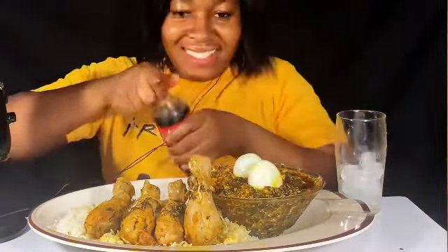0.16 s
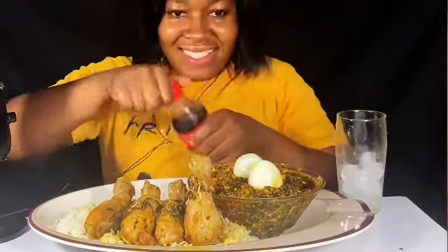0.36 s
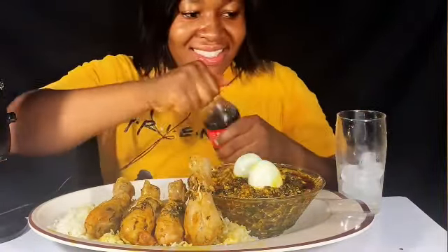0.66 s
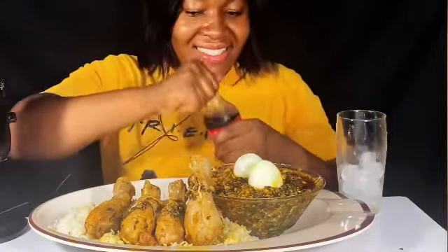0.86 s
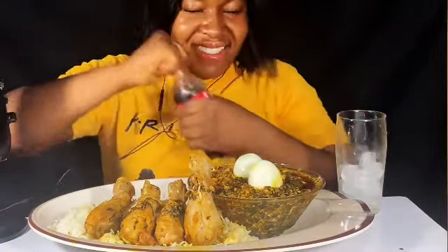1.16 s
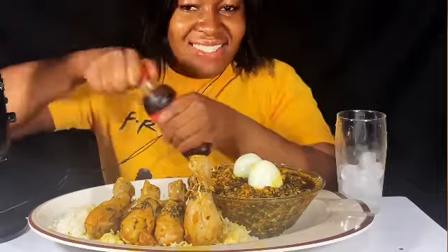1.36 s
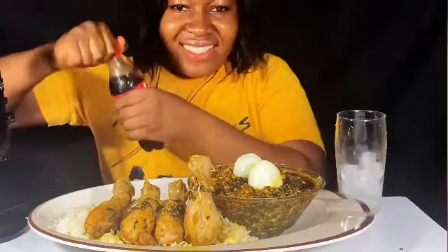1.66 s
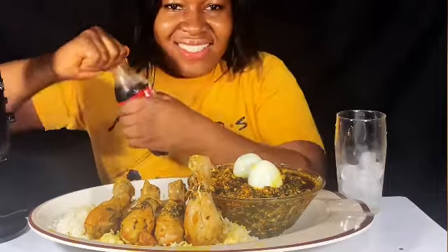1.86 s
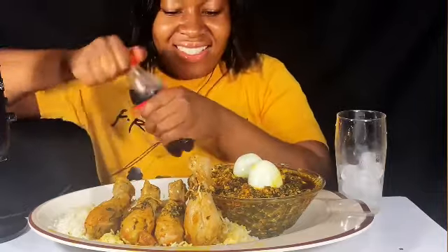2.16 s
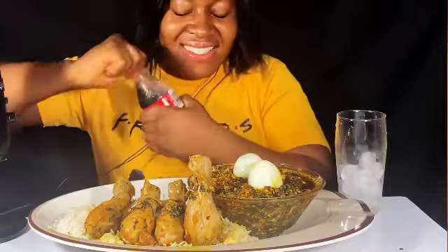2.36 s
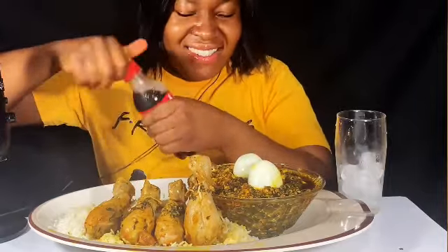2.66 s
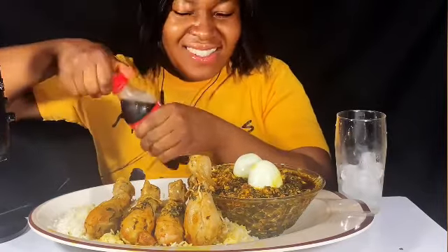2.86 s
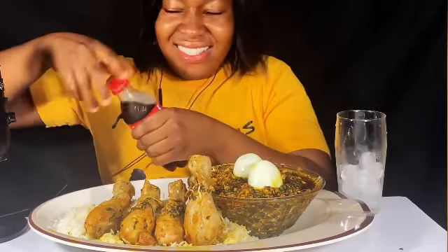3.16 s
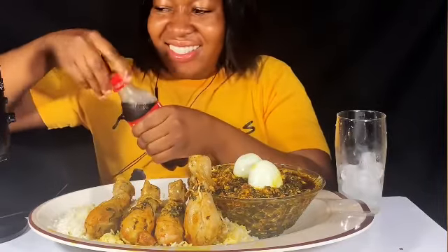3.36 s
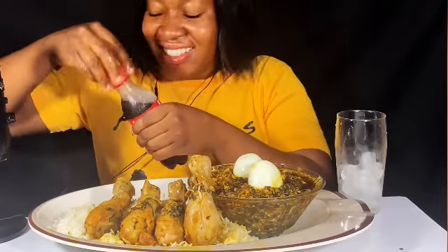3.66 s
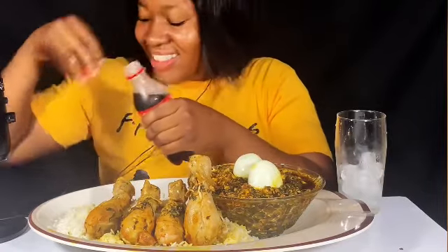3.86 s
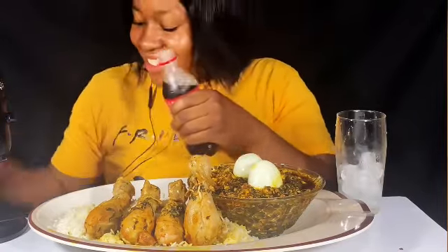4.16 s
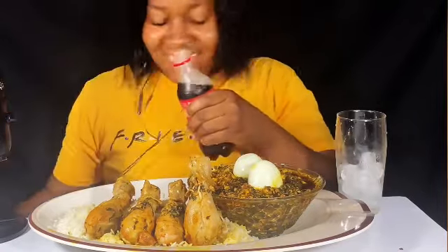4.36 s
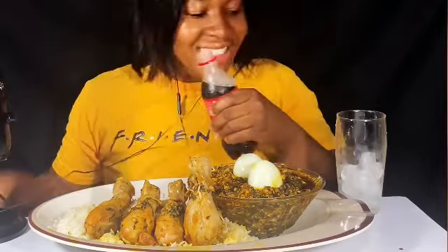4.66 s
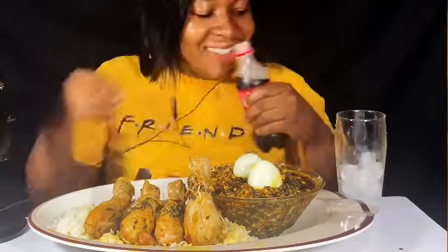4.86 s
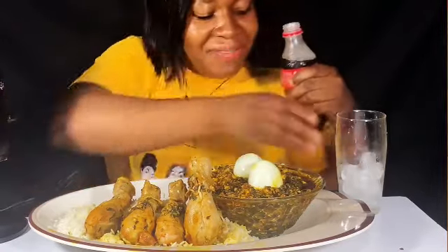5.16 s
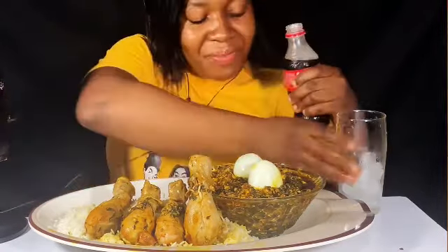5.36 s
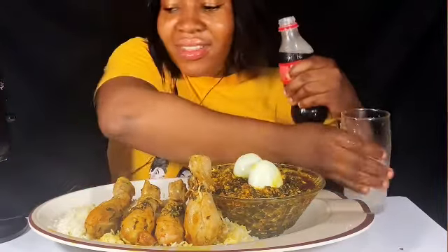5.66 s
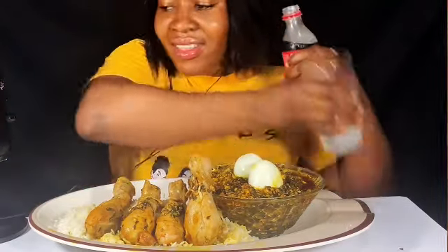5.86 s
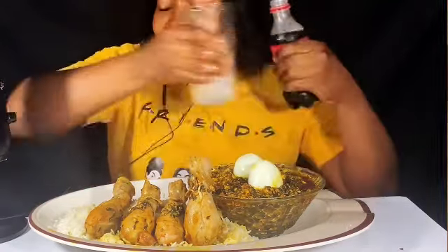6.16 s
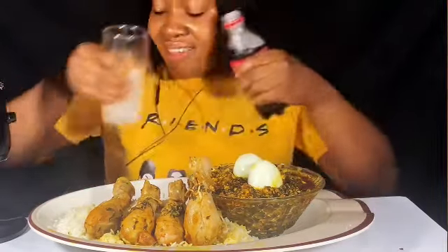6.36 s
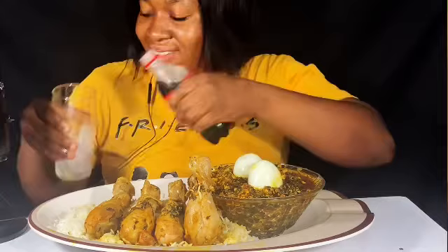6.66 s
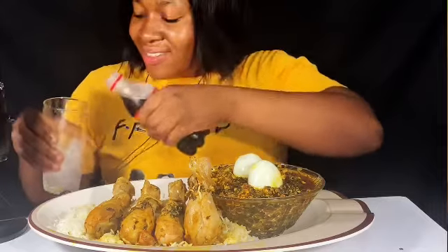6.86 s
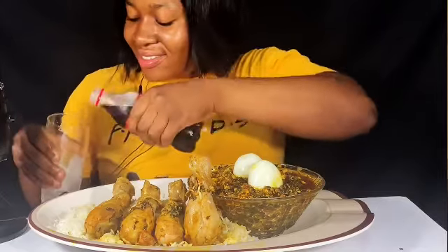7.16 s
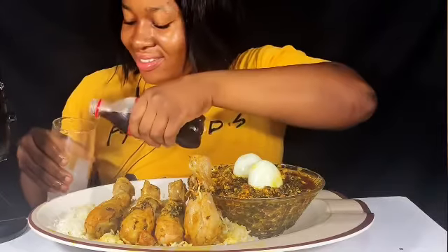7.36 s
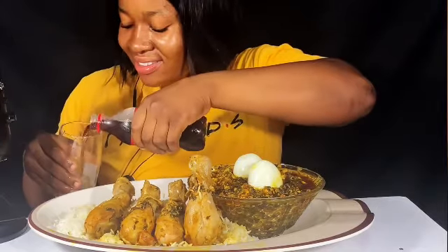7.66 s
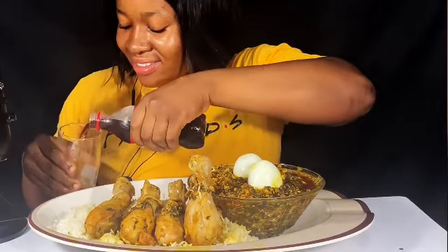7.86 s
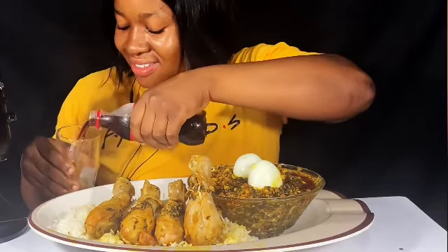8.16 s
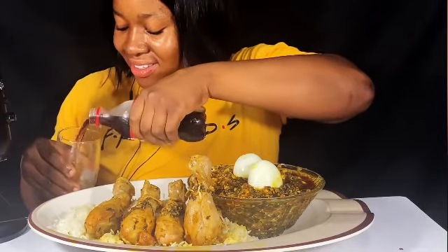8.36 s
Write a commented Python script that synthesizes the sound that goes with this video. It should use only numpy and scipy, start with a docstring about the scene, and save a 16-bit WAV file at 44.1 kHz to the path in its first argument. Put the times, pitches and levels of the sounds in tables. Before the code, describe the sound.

A fizzy drink is opened and poured at a table, heard close and dry over soft low handling rumble. Small cap ticks and a thin leak lead to a bright, forceful burst of gas, followed by clustered plastic clicks, scratchy thread rubbing and a short upward squeak. Later come a low glass scrape, one hard dry ice knock, faint cloth rustle, then crisp drops, hollow plops and pattering gushes with fine fizz.

```python
"""Over a low rumble of body movement and a faint hiss, a small plastic bottle of fizzy drink is opened up close:
the cap creaks, gas seeps, the pressure blows off with a pop and the cap rasps up its thread, squeaking as it lifts.
Then a glass judders off the table, its ice knocks in dry clacks, and sleeves brush past.
Last, drops splat on the ice, air pockets plop, and the drink patters and fizzes in gushes.
Noise is coloured for gas and hiss; random clicks drive rubbing, pouring and fizz; struck resonances make the hits."""
import sys
import numpy as np
from scipy import signal
from scipy.fft import rfft, irfft
from scipy.io import wavfile

SR = 44100
rng = np.random.default_rng(int(sys.argv[2]) if len(sys.argv) > 2 else 0)


def unload_wav(signal):
    """Save mono or channel-first audio to the path in sys.argv[1] as 16-bit WAV at rate SR, clipped to [-1, 1]."""
    wavfile.write(
        sys.argv[1],
        SR,
        np.round(np.clip(np.atleast_2d(signal).T, -1, 1) * 32767).astype(np.int16),
    )


N = 374850
TIME = np.arange(N) / SR
BIN_HZ = np.arange(N // 2 + 1) * SR / N
# Levels in the tables and settings are relative: they hold before any later trim or mix gain.


def from_db(db):
    """Amplitude factor of a level in dB."""
    return 10 ** (np.asarray(db) / 20)


def rms_one(x):
    """Scale to an rms of 1."""
    return x / np.sqrt(np.mean(x ** 2) + 1e-20)


def peak_one(x):
    """Scale to a peak of 1."""
    return x / (np.abs(x).max() + 1e-20)


def at_hz(points, hz):
    """Read a table on a log-frequency axis."""
    return np.interp(np.log(hz + 1), np.log(np.array(points)[:, 0]), np.array(points)[:, 1])


def colour(x, spectrum):
    """Filter x to a spectrum that falls away beyond its ends; rms 1."""
    low_end = np.minimum(BIN_HZ / spectrum[0][0], 1) ** 4
    high_end = np.minimum(spectrum[-1][0] / (BIN_HZ + 1), 1) ** 4
    gain = from_db(at_hz(spectrum, BIN_HZ)) * low_end * high_end
    return rms_one(irfft(rfft(x) * gain, N))


# Stereo image of noise: f/Hz, left-right likeness (1 = the same)
LIKENESS = [(40, 0.89), (110, 0.67), (170, 0.24), (350, 0.453), (1500, 0.73), (5000, 0.5), (9000, 0.86),
            (15000, 0.25)]


def noise():
    """White stereo noise, partly alike in the two channels."""
    alike = np.clip(at_hz(LIKENESS, BIN_HZ), -1, 1)
    mid, side = rfft(rng.standard_normal((2, N)))
    return irfft(np.sqrt(1 + alike) * mid + np.sqrt(1 - alike) * side * [[1], [-1]], N)


def grains(per_s, spread_db):
    """Random clicks of uneven size and either sign."""
    chance = rng.uniform(-1, 1, N) * SR / per_s
    born = np.abs(chance) < 1
    size_db = spread_db * np.minimum(-np.log(np.abs(chance[born])), 4)
    clicks = np.zeros(N)
    clicks[born] = np.sign(chance[born]) * from_db(size_db)
    return clicks


def resonate(x, modes):
    """Parallel two-pole resonances of (f/Hz, width/Hz, level/dB), alternating in sign."""
    out = 0
    for k, (hz, width, db) in enumerate(modes):
        r = np.exp(-np.pi * width / SR)
        poles = [1, -2 * r * np.cos(2 * np.pi * hz / SR), r * r]
        ring = (1 - r * r) / 2 * signal.lfilter([1, 0, -1], poles, x + 1e-18)
        out = out + (-1) ** k * from_db(db) * ring
    return out


def fade(t60):
    """An eighth of a second of decay, falling 60 dB in every t60 seconds."""
    return from_db(-60 * TIME[:SR // 8] / t60)


def ping(hz, t60, rise=0.0, build_cycles=0.0092):
    """A dying sine that builds over some cycles and whose pitch rises by a share over t60."""
    decay = fade(t60)
    t = TIME[:len(decay)]
    build = 1 - np.exp(-t * hz / build_cycles)
    cycles = hz * t * (1 + rise * np.minimum(t / t60, 1) / 2)
    return peak_one(np.sin(2 * np.pi * cycles) * decay * build)


def crack(t60):
    """A sharp contact followed by a dying spray of tiny slips."""
    decay = fade(t60)
    burst = rng.standard_normal(len(decay)) * decay
    burst[0] = 4   # the contact itself
    return peak_one(burst)


def add(track, s, sound):
    """Put a sound into the track at s seconds."""
    at = round(s * SR)
    track[at:at + len(sound)] += sound[:N - at]


def flutter(depth_db, per_s):
    """A gain that wavers at random between per_s knots a second."""
    knots = np.arange(0, N / SR + 1, 1 / per_s)
    return from_db(depth_db * np.interp(TIME, knots, rng.standard_normal(len(knots))))


def swell(s, db, attack_s, hold_s, release_s):
    """A gain that climbs 60 dB to reach its level at s, holds, and falls 60 dB in each release time."""
    gain = np.zeros(N)
    near = slice(*np.searchsorted(TIME, [s - 2 * attack_s, s + hold_s + 2 * release_s]))
    before = np.maximum((s - TIME[near]) / attack_s, 0)
    after = np.maximum((TIME[near] - s - hold_s) / release_s, 0)
    gain[near] = from_db(db - 60 * (before + after))
    return gain


def strokes(rows, attack_s, release_s):
    """Gain of movements (t/s, level/dB, hold/s) that share one attack and release."""
    return np.max([swell(s, db, attack_s, hold_s, release_s) for s, db, hold_s in rows], axis=0)


def wavering(hz, width_hz):
    """A narrow noise band whose centre follows hz over time; rms 1."""
    lowpass = signal.butter(2, width_hz / 2, fs=SR, output="sos")
    waver = signal.sosfilt(lowpass, rng.standard_normal((2, N)))
    phase = 2 * np.pi * np.cumsum(hz) / SR
    return rms_one(waver[0] * np.cos(phase) + waver[1] * np.sin(phase))


def bubbles(per_s, pitches, cycles, tilt_db):
    """Random bubbles, each ringing a few cycles at its own pitch; tilt in dB per octave; rms 1."""
    out = 0
    for hz in pitches:
        births = grains(per_s / len(pitches), spread_db=8.0)
        out = out + resonate(births, [(hz, hz / cycles, tilt_db * np.log2(hz / pitches[0]))])
    return rms_one(out)


def spread(x, near_db, near_t60):
    """Table and hands reflect within milliseconds, with opposite sign to each side."""
    decay = fade(near_t60)
    scatter = rng.standard_normal(len(decay)) * decay
    side = signal.fftconvolve(x, scatter / np.linalg.norm(scatter))[:N]
    return x + from_db(near_db) * side * [[1], [-1]]


def right_leads(x, samples):
    """Sound from the right reaches that microphone a little sooner."""
    turn = np.exp(1j * np.pi * samples * np.arange(N // 2 + 1) / N * np.array([[-1], [1]]))
    return irfft(rfft(x) * turn, N)


ROOM_T60_S = 0.15


def room(x, wall_hz):
    """The short diffuse tail of a draped room, its treble softened above wall_hz."""
    t = TIME[:SR // 2]
    late = t > .004   # nothing returns in the first 4 ms
    tail = rng.standard_normal((2, len(t))) * from_db(-60 * t / ROOM_T60_S) * late
    tail = signal.sosfilt(signal.butter(1, wall_hz, fs=SR, output="sos"), tail)
    tail = tail / np.linalg.norm(tail, axis=1, keepdims=True)
    return signal.fftconvolve(x, tail, axes=1)[:, :N]


# Steady hiss of the room: f/Hz, level/dB per Hz
AIR = [(150, -9), (250, -5.5), (378, -6), (593, -11), (950, -12), (1160, -10), (4300, -19.5), (15500, -35)]
AIR_DB = -48


def room_hiss():
    """Steady coloured noise."""
    return from_db(AIR_DB) * colour(noise(), AIR)


# Movement rumble over time: t/s, deep level/dB, upper level/dB
RUMBLE = [(0.0, -33.5, -42.5), (0.52, -35, -40), (0.8, -31.5, -41), (0.97, -30.5, -36), (1.7, -38.5, -44.5),
          (2.79, -39, -43.5), (2.98, -40, -37.5), (3.64, -34, -44.5), (4.07, -41.5, -45.5),
          (4.57, -36, -39), (5.21, -38, -43.5), (6.3, -37.5, -44.5), (6.67, -41, -47), (8.5, -41, -47)]
# Spectra of its two bands, DEEP also being the rumble of the table: f/Hz, level/dB per Hz
DEEP = [(20, 2.5), (30, 1.5), (48, -7), (68, 1.5), (90, -10.5), (120, -19.5)]
UPPER = [(60, -48), (85, -3.5), (110, 0), (140, -6.5), (190, -7.5), (260, -20.5), (400, -31), (700, -39.5)]
RUMBLE_DEEP_DB, RUMBLE_UPPER_DB = 3, 3.5   # trims on the two level columns


def movement_rumble():
    """Body movement as two bands of low noise, each riding its own level curve."""
    s, deep_db, upper_db = np.transpose(RUMBLE)
    deep = from_db(RUMBLE_DEEP_DB + np.interp(TIME, s, deep_db)) * colour(noise(), DEEP)
    upper = from_db(RUMBLE_UPPER_DB + np.interp(TIME, s, upper_db)) * colour(noise(), UPPER)
    return (deep + upper) * from_db([[.4], [-.4]])   # left a touch louder


# Soft low bumps of the hands and of the glass sliding on the table: t/s, level/dB, f/Hz
BUMPS = [(0.88, -20.5, 61), (3.07, -20.5, 106), (3.533, -20, 78), (5.537, -20.5, 39.7), (5.636, -24, 55)]


def bumps(length_s):
    """Hands and the sliding glass bump softly: each a brief low sine under a bell-shaped envelope."""
    out = np.zeros(N)
    for s, db, hz in BUMPS:
        bell = np.exp(-((TIME - s) / length_s) ** 2)
        out = out + from_db(db) * bell * np.sin(2 * np.pi * hz * (TIME - s))
    return out


# Sleeves brush as the arms move: t/s, level/dB, hold/s
BRUSHES = [(6.57, -54.5, 0.071), (6.98, -59.5, 0.21)]
BRUSH_ATTACK_S, BRUSH_RELEASE_S = 0.87, 1


def sleeves():
    """Cloth brushing as slow swells of broad noise, softer toward the top."""
    cloth = colour(noise(), [(800, 0.5), (6500, -2.0), (15000, -10.5)])
    return strokes(BRUSHES, BRUSH_ATTACK_S, BRUSH_RELEASE_S) * cloth


def background():
    """Movement rumble, soft low bumps, brushing sleeves and steady room hiss."""
    return movement_rumble() + bumps(length_s=0.01) + right_leads(room_hiss() + sleeves(), samples=1.0)


# Judder of glass on table: f/Hz, level/dB per Hz
SLIDE_COLOUR = [(90, -2.5), (200, 5), (300, -11.5), (520, -12.5), (700, -20), (2200, -21.5), (4000, -33),
                (12000, -44)]
# The foot of the glass catches on the table: t/s, level/dB
SCUFFS = [(5.536, -36), (5.549, -32), (5.5743, -23), (5.58, -37), (5.605, -35)]
# Ring of each catch: f/Hz, width/Hz, level/dB
SCUFF_MODES = [(520, 290, -3), (1030, 220, 10.5), (1500, 500, 0.5), (2230, 520, -5)]
SLIDE_S, SLIDE_DB, SLIDE_ATTACK_S, SLIDE_HOLD_S, SLIDE_RELEASE_S = 5.55, -35.5, 0.053, 0.072, 0.3
TABLE_DB, TABLE_RELEASE_S = -27, 1


def glass_slide(judder_spread_db):
    """The foot of the glass judders over the rumbling table and catches several times."""
    catches = np.zeros(N)
    for s, db in SCUFFS:
        add(catches, s, from_db(db) * peak_one(resonate(crack(t60=0.022), SCUFF_MODES)))
    drag = swell(SLIDE_S, SLIDE_DB, SLIDE_ATTACK_S, SLIDE_HOLD_S, SLIDE_RELEASE_S)
    table = swell(SLIDE_S, TABLE_DB, SLIDE_ATTACK_S, SLIDE_HOLD_S, TABLE_RELEASE_S) * colour(noise(), DEEP)
    judder = colour(grains(per_s=1500, spread_db=judder_spread_db), SLIDE_COLOUR)
    return drag * spread(judder, near_db=-2.5, near_t60=0.025) + table + catches


# Ice knocking in the glass: t/s, level/dB, body level/dB
KNOCKS = [(5.7, -23, 3), (5.938, -23, -27), (5.9403, -10, -28.5), (5.9432, -8.5, -8), (5.95, -33, -15)]
# Ring of cube and glass: f/Hz, width/Hz, level/dB
ICE = [(1430, 130, 11.5), (2350, 1700, 15.5), (3500, 250, 3), (4100, 390, -20), (4950, 3300, 7.5),
       (6900, 590, 20)]


def ice(crack_t60, tick_db, body_hz, body_t60, lowest_hz, highest_hz):
    """Cubes shift and hit the wall of the glass, which the hand damps: a short, dry clack without bass."""
    out = np.zeros(N)
    for s, db, body_db in KNOCKS:
        hit = crack(crack_t60)
        cube = peak_one(resonate(hit, ICE)) + from_db(tick_db) * hit
        body = from_db(body_db) * ping(body_hz, body_t60)
        add(out, s, from_db(db) * (1.26 * cube + 0.36 * body))
    band = signal.butter(2, [lowest_hz, highest_hz], "band", fs=SR, output="sos")
    return signal.sosfilt(band, out + 1e-18)


# Drops landing on ice: t/s, level/dB, f/Hz
DROPS = [(7.591, -32, 8950), (7.707, -29.5, 3390), (7.746, -28.5, 5930), (7.818, -19.5, 6700),
         (7.864, -27.5, 7360), (7.9, -20.5, 6300), (7.908, -30, 6560), (7.9125, -25, 1670),
         (7.928, -20, 5330), (8.002, -30, 4480), (8.022, -25, 5550), (8.029, -21, 7700),
         (8.0555, -24, 8060), (8.065, -20, 8200), (8.082, -18.5, 2320), (8.086, -24, 3300),
         (8.096, -24, 10000), (8.102, -23, 2320), (8.1472, -16.5, 6180), (8.227, -17, 7080),
         (8.255, -27.5, 1700), (8.271, -23.5, 2590), (8.2805, -27, 7200), (8.2887, -23, 4630),
         (8.29, -27, 3470), (8.299, -24, 4500), (8.312, -20, 13500), (8.3295, -35, 1600),
         (8.422, -28, 2700), (8.44, -28, 5670), (8.489, -27, 13000)]
# Air column of the glass, for drops, plops and pour: f/Hz, width/Hz, level/dB
GLASS_AIR = [(480, 260, -6), (865, 130, 8), (1790, 120, -1), (2540, 510, 1), (3270, 790, -6)]


def drops(ring_t60, rise, splat_db, splat_t60, hollow_db):
    """A drop splats on the ice and traps a bubble; the glass adds its hollow note."""
    out = np.zeros(N)
    for s, db, hz in DROPS:
        splat = peak_one(resonate(crack(splat_t60), [(hz, hz * 0.36, 0), (10500, 6000, -14)]))
        bubble = ping(hz, ring_t60, rise, build_cycles=1.6)
        add(out, s, from_db(db) * (.55 * bubble + from_db(splat_db) * splat))
    return out + from_db(hollow_db) * resonate(out, GLASS_AIR)


# Pockets of air closing between the cubes: t/s, level/dB, f/Hz
PLOPS = [(7.973, -32.5, 800), (8.086, -28.5, 855), (8.118, -36, 810), (8.236, -33.5, 840),
         (8.328, -36, 930), (8.461, -38.5, 930)]


def plops(thump_t60, note_db, note_t60, rise):
    """Each pocket closes with a dull thump, and the air in the glass sings on."""
    out = np.zeros(N)
    for s, db, hz in PLOPS:
        glass_air = ping(GLASS_AIR[0][0], 2 * thump_t60)
        thump = peak_one(ping(hz, thump_t60, build_cycles=0.52) + .5 * glass_air)
        note = ping(hz, note_t60, rise)
        add(out, s, from_db(db) * (thump + from_db(note_db) * note))
    return out


# Gushes of the pour: t/s, hold/s, splash level/dB, fizz level/dB
GUSHES = [(8.024, 0.015, -44.5, -41), (8.081, 0.037, -44.5, -41.5), (8.268, 0.023, -40, -52),
          (8.283, 0.011, -44, -39), (8.455, 0.06, -55, -47)]
# Patter of the stream on ice: f/Hz, level/dB per Hz
PATTER_COLOUR = [(700, 6), (1700, 1), (5000, 0), (12000, -19)]
TRICKLE_S, TRICKLE_ATTACK_S, TRICKLE_SPLASH_DB, TRICKLE_FIZZ_DB = 7.95, 0.27, -51.5, -55
GUSH_ATTACK_S, GUSH_RELEASE_S = 0.078, 0.22


def pour(splashes_per_s, blip_db, splash_db, patter_db):
    """Gushes over a thin trickle patter in the glass and fold in air, while tiny gas bubbles burst."""
    splash = rms_one(resonate(grains(splashes_per_s, spread_db=10.0), GLASS_AIR))
    blips = bubbles(1100, np.geomspace(1100, 6000, num=14), cycles=23, tilt_db=0.5)
    impacts = signal.fftconvolve(np.abs(grains(per_s=400, spread_db=4.5)), fade(t60=0.0046))[:N]
    patter = colour(impacts * rng.standard_normal(N), PATTER_COLOUR)
    fizz = bubbles(2600, np.geomspace(6000, 15000, num=24), cycles=12, tilt_db=-4.0)
    fizz = fizz * flutter(depth_db=4.5, per_s=210)   # bursts come in clusters
    trickle = swell(TRICKLE_S, 0, TRICKLE_ATTACK_S, N / SR, GUSH_RELEASE_S)   # holds to the end
    flow, foam = from_db(TRICKLE_SPLASH_DB) * trickle, from_db(TRICKLE_FIZZ_DB) * trickle
    for s, hold_s, flow_db, foam_db in GUSHES:
        gush = swell(s, 0, GUSH_ATTACK_S, hold_s, GUSH_RELEASE_S)
        flow = np.maximum(flow, from_db(flow_db) * gush)
        foam = np.maximum(foam, from_db(foam_db) * gush)
    water = from_db(splash_db) * splash + from_db(blip_db) * blips + from_db(patter_db) * patter
    return flow * water + foam * fizz


# Fingers shift their grip on the bottle: t/s, level/dB, hold/s, treble level/dB
GRIPS = [(1.249, -47.5, 0.014, -2), (1.29, -49, 0.012, -1.5), (2.87, -47.5, 0.018, -0.5),
         (4.351, -47, 0.023, -16)]
# Spectra of skin and label: f/Hz, level/dB per Hz
SKIN_COLOUR = [(350, 3), (1700, -3), (3000, -7.5), (5000, -27)]
LABEL_COLOUR = [(4500, -1), (5800, 0), (9000, -6), (15000, -13)]
GRIP_ATTACK_S, GRIP_RELEASE_S = 0.036, 0.15


def grips(slips_per_s):
    """Skin scuffs softly on the bottle and crinkles its label."""
    skin = colour(grains(slips_per_s, spread_db=3.5), SKIN_COLOUR)
    label = colour(grains(slips_per_s, spread_db=5.0), LABEL_COLOUR)
    out = np.zeros(N)
    for s, db, hold_s, treble_db in GRIPS:
        grip = swell(s, db, GRIP_ATTACK_S, hold_s, GRIP_RELEASE_S)
        out = out + grip * (skin + from_db(treble_db) * label)
    return out


# Creaks of the tight cap as strain builds, then relaxes: t/s, level/dB, rise/s, f/Hz, ring level/dB
CREAKS = [(0.970, -39.5, 0.035, 3460, 9), (1.648, -41, 0.12, 3180, -1), (2.082, -44.5, 0.05, 2846, 6),
          (2.215, -37, 0.17, 3300, 0.5), (2.98, -32.5, 0.031, 4396, -8)]
# Ring of the strained cap: f/Hz, width/Hz, level/dB
CREAK_MODES = [(4770, 2200, -8), (8700, 1800, -10), (13380, 1000, -14)]
CREAK_HOLD_S, CREAK_RELEASE_S = 0.0028, 0.19


def cap_creak(ring_width_hz):
    """Fine slips under strain ring the cap, each creak with a pitch of its own."""
    slips = grains(per_s=1500, spread_db=4.0)
    shell = resonate(slips, CREAK_MODES)
    out = np.zeros(N)
    for s, db, rise_s, hz, ring_db in CREAKS:
        creak = rms_one(shell + resonate(slips, [(hz, ring_width_hz, ring_db)]))
        out = out + swell(s, db, rise_s, CREAK_HOLD_S, CREAK_RELEASE_S) * creak
    return out


# Strokes of fingers and thread on plastic: t/s, level/dB, hold/s, f/Hz of the wall under them
RUBS = [(1.926, -46, 0.037, 2490), (2.934, -35.5, 0.037, 2886), (3.09, -36.5, 0.015, 1800),
        (3.27, -36.5, 0.012, 3860), (3.329, -39, 0.014, 1250), (3.358, -34, 0.017, 2704),
        (3.411, -42.5, 0.024, 2000), (3.57, -41, 0.055, 2590)]
# Rasp of the strokes: f/Hz, level/dB per Hz
RUB_COLOUR = [(250, 11.5), (800, 0), (2300, 4), (4800, -5), (6500, -4), (9000, -14.5), (16000, -24.5)]
RUB_ATTACK_S, RUB_RELEASE_S = 0.11, 0.18
RUB_SAG_OCT_PER_S = 6.4   # the ring falls as the finger slides on


def cap_rub(slips_per_s, uneven_db, rasp_db, ring_db, ring_width_hz):
    """Stick-slip of skin and thread makes tiny scratches; the wall's ring sags in pitch in each stroke."""
    s, _, _, ring_hz = np.transpose(RUBS)
    nearest = np.searchsorted((s[1:] + s[:-1]) / 2, TIME)
    hz = ring_hz[nearest] * 2 ** (-RUB_SAG_OCT_PER_S * np.clip(TIME - s[nearest], -.04, .04))
    slips = np.abs(grains(slips_per_s, uneven_db))
    slips = rms_one(signal.fftconvolve(slips, fade(t60=0.009))[:N])
    rasp = colour(slips * rng.standard_normal(N), RUB_COLOUR)
    wall = slips * wavering(hz, ring_width_hz)
    stroke = strokes([row[:3] for row in RUBS], RUB_ATTACK_S, RUB_RELEASE_S)
    return stroke * (from_db(rasp_db) * rasp + from_db(ring_db) * wall)


# Turns of the loose cap: t/s, level/dB, hold/s
TURNS = [(3.105, -39, 0.062), (3.28, -42.5, 0.054), (3.35, -40, 0.11)]
# Note of the neck, wandering and then climbing as the cap lifts: t/s, f/Hz
NECK_PITCH = [(3.11, 385), (3.16, 325.6), (3.33, 336.2), (3.42, 371.4), (3.47, 411.4), (3.6, 345.5),
              (3.645, 484), (3.7, 615)]
# Hollow ring of the bottle: f/Hz, width/Hz, level/dB
BOTTLE_BODY = [(305, 61, -2), (430, 176, -4.5)]
BOTTLE_BODY_DB = -1.5   # relative to the note of the neck
TURN_ATTACK_S, TURN_RELEASE_S = 0.1, 0.08
LIFT_S, LIFT_DB, LIFT_ATTACK_S, LIFT_HOLD_S, LIFT_RELEASE_S = 3.64, -33.5, 0.11, 0.01, 0.1   # cap comes off


def neck():
    """The rubbing cap rings the neck's air and scrapes the hollow bottle; lifting, it squeaks upward."""
    hz = np.interp(TIME, *np.transpose(NECK_PITCH))
    note = wavering(hz, width_hz=45)
    body = from_db(BOTTLE_BODY_DB) * rms_one(resonate(grains(per_s=820, spread_db=7.0), BOTTLE_BODY))
    turning = strokes(TURNS, TURN_ATTACK_S, TURN_RELEASE_S)
    tone = np.sin(2 * np.pi * np.cumsum(hz) / SR)
    squeak = np.sqrt(.5) * tone + np.sqrt(.5) * wavering(hz, width_hz=130)   # the noise roughens it
    lift = swell(LIFT_S, LIFT_DB, LIFT_ATTACK_S, LIFT_HOLD_S, LIFT_RELEASE_S)
    return turning * (note + body) + lift * squeak


# Snaps and taps of cap and bottle: t/s, level/dB, ring f/Hz, thud level/dB, crack level/dB
SNAPS = [(0.9705, -16, 3580, -29, -10), (1.446, -21, 8800, -21, -17), (1.928, -31.5, 754, -1.5, 2),
         (1.967, -28.5, 860, -21, -3), (2.2829, -3.5, 1627, -12.5, -6.5), (2.921, -12, 4430, -14, -7.5),
         (2.936, -28, 4400, -14, -1), (2.9619, -15.5, 3280, -6, 7.5), (2.974, -14, 3400, -2.5, 8),
         (3.011, -26, 4300, -9, -1.5), (3.029, -23.5, 4250, -15, -6.5), (3.079, -19.5, 3940, -6.5, -10),
         (3.2347, -19.5, 662, 0.5, 1.5), (3.2672, -9, 2330, -8.5, -6), (3.2965, -22, 6380, -21, -5),
         (3.364, -19, 1630, -4, -3.5), (3.4172, -13.5, 2380, -7.5, -5.5), (3.544, -19.5, 2460, -1.5, -3),
         (3.588, -19.5, 2340, -5.5, -3.5), (3.653, -18.5, 8280, -18, -1.5), (4.446, -25.5, 2880, -15.5, -9),
         (5.119, -29.5, 1494, -10, -6)]
# Ring of the cap shell: f/Hz, width/Hz, level/dB
CAP = [(3440, 710, 2.5), (4500, 250, 5), (5040, 1090, -2), (7200, 685, -0.5), (13100, 790, -12)]
# Ring of the plastic wall: multiple of the ring pitch, level/dB
WALL_MODES = [(0.66, -12), (1, -1.5), (1.7, -9)]


def cap_snaps(crack_t60, shell_db, wall_cycles, thud_hz, thud_t60):
    """Each slip cracks the cap, rings the wall nearby for some cycles and thuds into the bottle."""
    thud_width_hz = np.log(1000) / np.pi / thud_t60
    out = np.zeros(N)
    for s, db, hz, thud_db, crack_db in SNAPS:
        slip = crack(crack_t60)
        wall = 0
        for ratio, mode_db in WALL_MODES:
            mode_hz = hz * ratio
            wall = wall + from_db(mode_db) * ping(mode_hz, wall_cycles / mode_hz, build_cycles=0.71)
        shell = peak_one(peak_one(resonate(slip, CAP)) * from_db(shell_db) + slip)
        thud = peak_one(resonate(slip, [(thud_hz, thud_width_hz, 0), (1100, 400, -3)]))
        add(out, s, from_db(db) * (.5 * wall + from_db(crack_db) * shell + from_db(thud_db) * thud))
    return out


# Thin hisses through the narrowest gap of the thread:
# t/s, level/dB, rise/s, hold/s, release/s, f/Hz, width/Hz
WISPS = [(0.969, -39, 0.012, 0.006, 0.1, 13600, 3200), (1.766, -37.5, 0.016, 0.02, 0.36, 13300, 2200),
         (2.165, -41, 0.2, 0.055, 0.1, 10300, 2600), (2.977, -34.5, 0.012, 0.012, 0.17, 13100, 1000),
         (3.65, -53, 0.015, 0.004, 0.17, 10500, 3000)]


def wisps():
    """Small escapes of gas hiss, each at a high pitch of its own."""
    hiss = np.zeros(N)
    for s, db, rise_s, hold_s, release_s, hz, width in WISPS:
        hiss = hiss + swell(s, db, rise_s, hold_s, release_s) * wavering(np.full(N, hz), width)
    return hiss * flutter(depth_db=5.5, per_s=90)


# Whistles in the gap as the cap is pushed open: t/s, level/dB, rise/s, hold/s, f/Hz, width/Hz
WHISTLES = [(2.348, -16.5, 0.043, 0.022, 6650, 800), (2.367, -21, 0.08, 0.032, 8170, 600),
            (2.385, -19.5, 0.18, 0.011, 5080, 350)]
WHISTLE_RELEASE_S, WHISTLE_RISE_OCT_PER_S = 0.07, 1.0


def whistles():
    """The gap sings in several resonances, each gliding up, during the jet."""
    out = np.zeros(N)
    for s, db, rise_s, hold_s, hz, width in WHISTLES:
        glide_hz = hz * 2 ** (WHISTLE_RISE_OCT_PER_S * np.clip(TIME - s, -.1, .1))
        out = out + swell(s, db, rise_s, hold_s, WHISTLE_RELEASE_S) * wavering(glide_hz, width)
    return out


# The seal gives way and lets out a spurt of gas: t/s, level/dB, rise/s, hold/s
SPURTS = [(1.769, -40.5, 0.017, 0.031), (2.184, -42.5, 0.16, 0.044), (2.287, -41.5, 0.1, 0.02)]
# Spectra of the leak and of the jet: f/Hz, level/dB per Hz
SEEP_COLOUR = [(1500, -12), (3800, -10), (5200, -1), (7000, 0.5), (9000, 1.5), (13000, 1), (14500, -4),
               (15500, -14)]
BLOW_COLOUR = [(150, -30), (221, -13.5), (302, -11.5), (1220, -11), (2230, -8), (3290, -2.5), (4570, -2.5),
               (5140, 3.5), (5770, -0.5), (8030, 0.5), (12500, -1), (15500, -5.5)]
SPURT_RELEASE_S = 0.22
SEEP_DB = -46.5   # leak from the first spurt until the blow-off
# the pressure blows off, holds while the bottle empties, and trails away
BLOW_S, BLOW_DB, BLOW_ATTACK_S, BLOW_HOLD_S, BLOW_RELEASE_S = 2.343, -8, 0.054, 0.045, 0.13
BLOW_TAIL_DB, BLOW_TAIL_S = -16.5, 0.21


def gas(whistle_db, pop_db, pop_hz, pop_t60):
    """A sputtering leak, then a pop and a ragged jet that whistles in the gap under the cap."""
    sputter = wavering(5400 * flutter(depth_db=0.75, per_s=17), width_hz=830)   # its pitch wanders
    seep = from_db(-2.5) * colour(noise(), SEEP_COLOUR) * flutter(depth_db=2.5, per_s=45)
    seep = seep + from_db(-11.5) * sputter * flutter(depth_db=4.5, per_s=45)
    leak = from_db(SEEP_DB) * (TIME > SPURTS[0][0]) * (TIME < BLOW_S)
    for s, db, rise_s, hold_s in SPURTS:
        leak = leak + swell(s, db, rise_s, hold_s, SPURT_RELEASE_S)
    pop = np.zeros(N)
    add(pop, 2.340, from_db(pop_db) * (ping(pop_hz, pop_t60) + from_db(-16.0) * ping(196, 0.0288)))
    blow = swell(BLOW_S, BLOW_DB, BLOW_ATTACK_S, BLOW_HOLD_S, BLOW_RELEASE_S)
    blow = blow * flutter(depth_db=1.2, per_s=270)
    tail = swell(BLOW_S, BLOW_TAIL_DB, BLOW_ATTACK_S, BLOW_HOLD_S, BLOW_TAIL_S)
    tail = tail * flutter(depth_db=2.5, per_s=300)
    jet = np.maximum(blow, tail) * colour(noise(), BLOW_COLOUR)
    return leak * seep + jet + from_db(whistle_db) * whistles() + wisps() + pop


def scene():
    """Place each source in stereo, then add the room and the background."""
    cubes = ice(crack_t60=0.012, tick_db=5.0, body_hz=1430, body_t60=0.015, lowest_hz=1310, highest_hz=9500)
    drink = drops(ring_t60=0.012, rise=0.11, splat_db=-3.5, splat_t60=0.018, hollow_db=-8.0)
    drink = drink + plops(thump_t60=0.0068, note_db=-10.5, note_t60=0.08, rise=0.08)
    drink = drink + pour(splashes_per_s=910, blip_db=-1.5, splash_db=-5.5, patter_db=-5.0)
    cap = grips(slips_per_s=3000) + cap_creak(ring_width_hz=550) + neck()
    cap = cap + cap_rub(slips_per_s=600, uneven_db=3.0, rasp_db=-1.0, ring_db=-8.0, ring_width_hz=1000)
    cap = cap + cap_snaps(crack_t60=0.021, shell_db=0.0, wall_cycles=31, thud_hz=405, thud_t60=0.014)
    jet = gas(whistle_db=1.0, pop_db=-2.5, pop_hz=366, pop_t60=0.0046)
    close = right_leads(spread(cap + cubes, near_db=-8.5, near_t60=0.0049), samples=0.99)
    close = close + right_leads(spread(drink, near_db=-11.0, near_t60=0.012), samples=1.8)
    close = close + right_leads(jet, samples=1.37)
    close = close * from_db([[-.3], [.3]])   # right a touch louder
    close = close + glass_slide(judder_spread_db=1.5)
    return close + from_db(-13.5) * room(close, wall_hz=9030) + background()


CUTOFF_HZ = 15800


def record(dry):
    """Peaks overload at full scale and the top is cut."""
    lowpass = signal.ellip(10, .1, 70, CUTOFF_HZ, fs=SR, output="sos")
    return signal.sosfilt(lowpass, np.clip(dry, -1, 1))


dry = scene()
out = record(dry)
unload_wav(out)
```